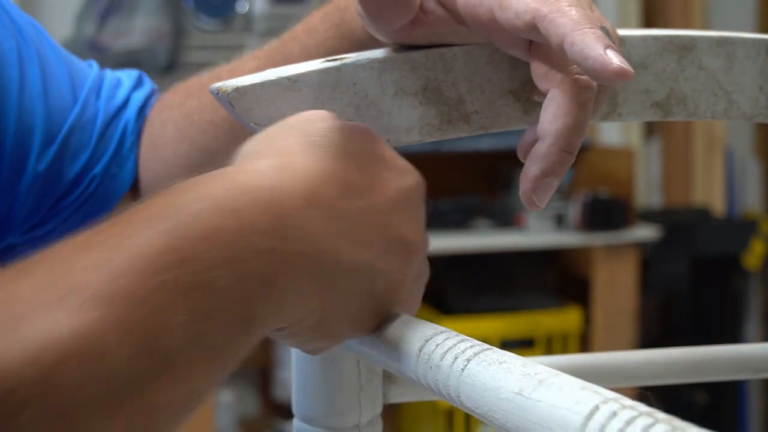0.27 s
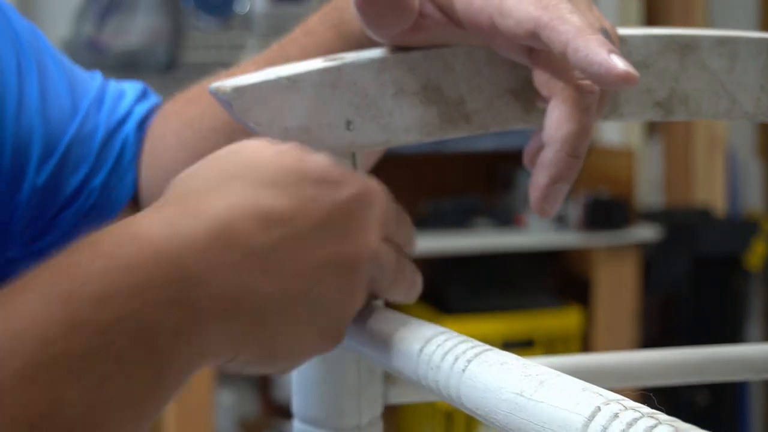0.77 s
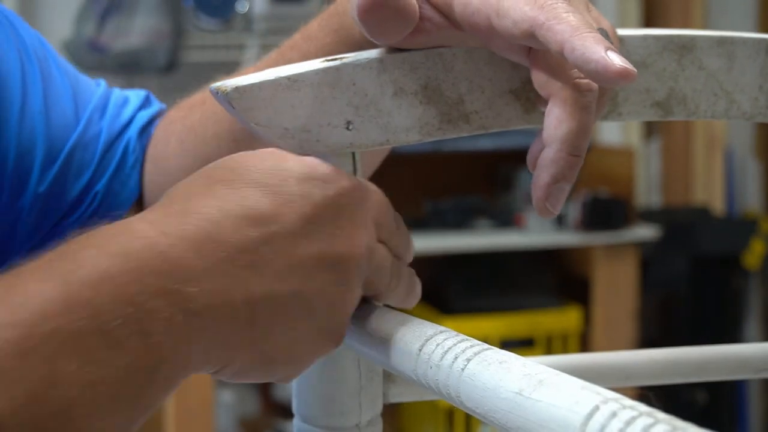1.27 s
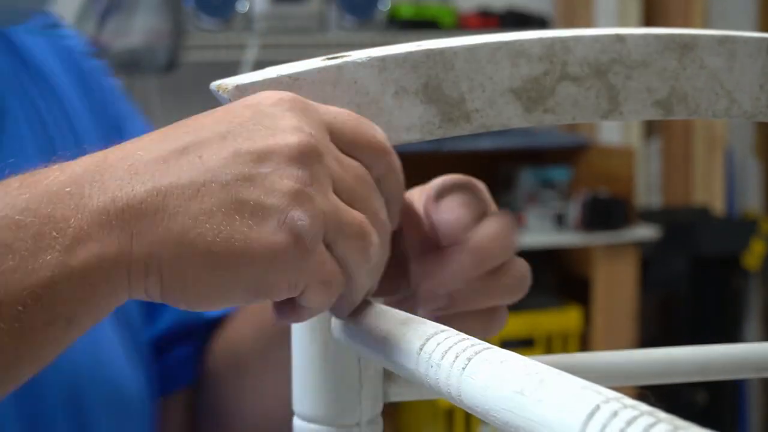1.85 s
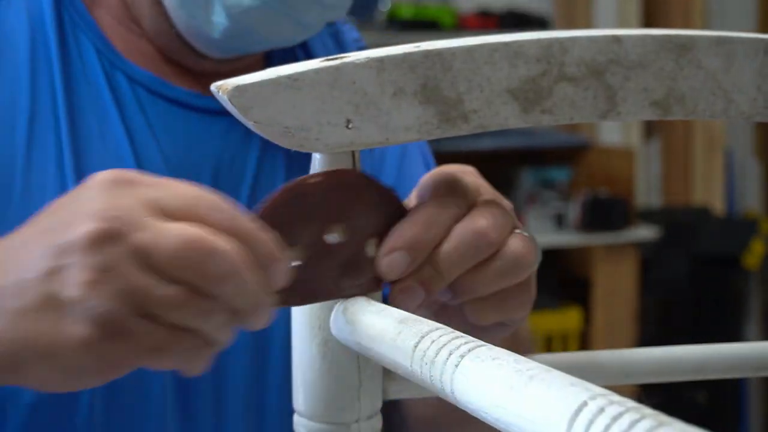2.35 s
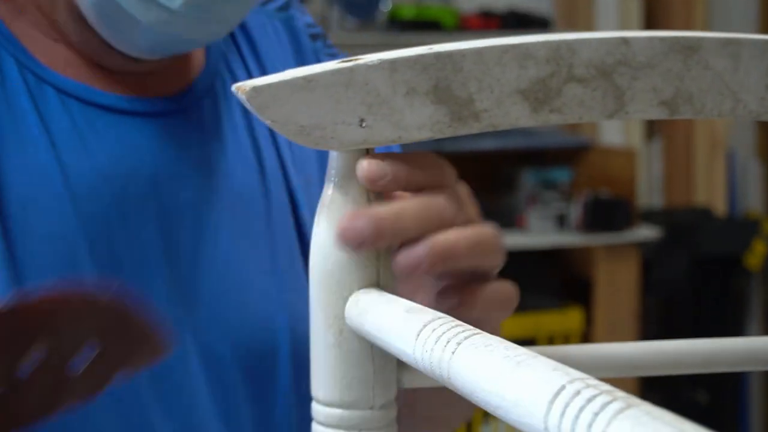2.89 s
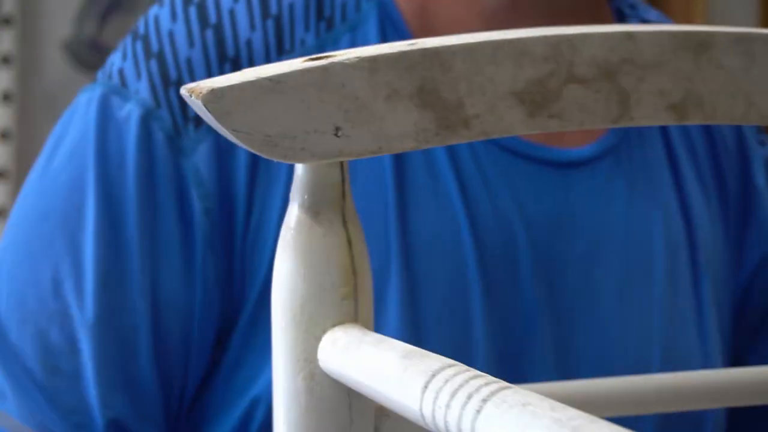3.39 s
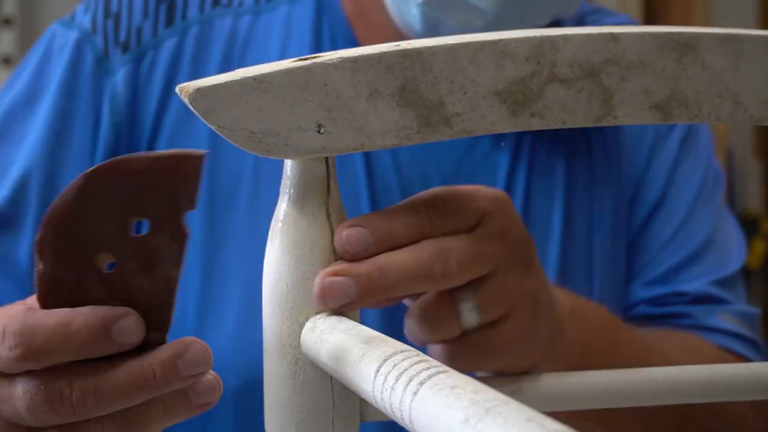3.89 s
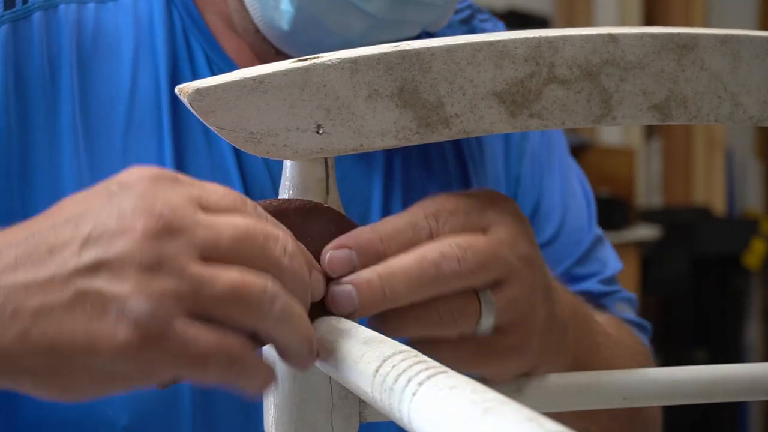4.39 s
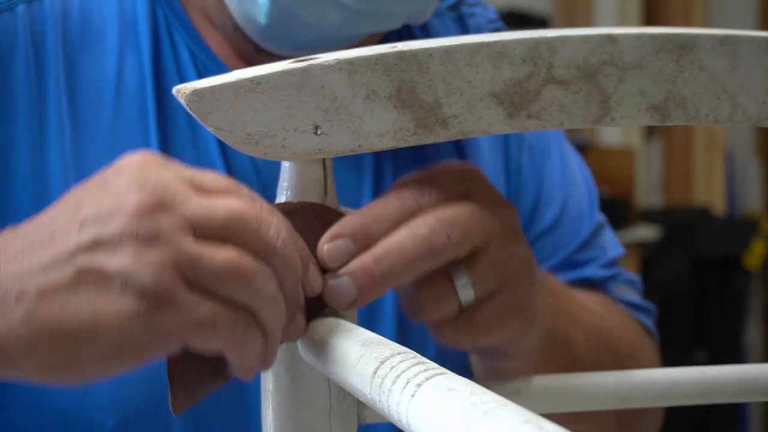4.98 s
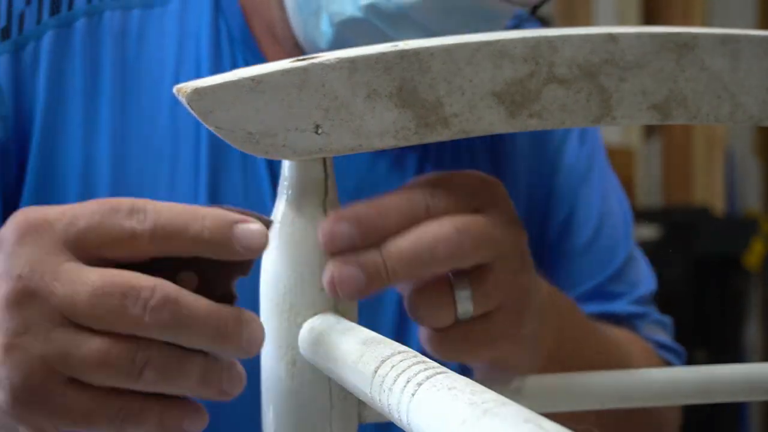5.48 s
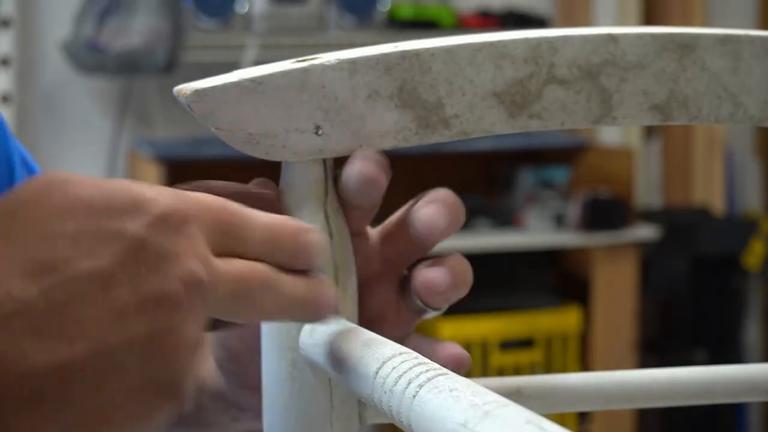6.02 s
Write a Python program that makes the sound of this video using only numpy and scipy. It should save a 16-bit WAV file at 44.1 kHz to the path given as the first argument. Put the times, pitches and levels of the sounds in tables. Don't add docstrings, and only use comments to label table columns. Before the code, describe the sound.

Close, sped-up hand sanding: bursts of raspy hissing strokes, some twenty to thirty a second, over a bassy floor rumble. The first bout gives way to light touches, the second ends in wooden chair legs knocking and rocking with boomy clipped thumps. Skin squeaks follow, then thinner, quicker strokes with hollow spindle taps, another squeak and a final short burst. The small workshop is quiet, with thin high insect song and smeared, shifting stereo.

```python
import sys
import numpy as np
from scipy import signal
from scipy.fft import rfft, irfft
from scipy.io import wavfile
from scipy.ndimage import uniform_filter1d, map_coordinates

SR = 44100
rng = np.random.default_rng(int(sys.argv[2]) if len(sys.argv) > 2 else 0)


def inscribe(sig):
    pcm = np.round(np.clip(np.atleast_2d(sig).T, -1, 1) * 32767)
    wavfile.write(sys.argv[1], SR, pcm.astype(np.int16))


def boost_factor(decibels):
    exponent = np.asarray(decibels, float) / 20
    return 10 ** exponent


N = 275625


def rms_one(x):
    return x / np.sqrt(np.mean(x ** 2) + 1e-20)


def colour(x, spectrum):
    hz = np.maximum(np.fft.rfftfreq(N, 1 / SR), 1)
    points = np.array(spectrum)
    gain_db = np.interp(np.log(hz), np.log(points[:, 0]), points[:, 1])
    return rms_one(irfft(rfft(x) * boost_factor(gain_db), N))


def at_every_sample(slow):
    return np.interp(np.arange(N) / 20, np.arange(len(slow)), slow)


def drift(rate_hz):
    r = np.exp(-2 * np.pi * rate_hz * 20 / SR)
    slow = signal.lfilter([1], [1, -2 * r, r * r], rng.standard_normal(N // 20 + 2002))
    return at_every_sample(rms_one(slow[2000:]))


def resonance(x, hz, width_hz):
    r = np.exp(-np.pi * width_hz / SR)
    poles = [1, -2 * r * np.cos(2 * np.pi * hz / SR), r * r]
    return signal.lfilter([(1 - r * r) / 2, 0, (r * r - 1) / 2], poles, x)


def ring(clicks, hz, t60):
    r = boost_factor(-60 / (t60 * SR))
    w = 2 * np.pi * hz / SR
    return signal.lfilter([0, np.sin(w)], [1, -2 * r * np.cos(w), r * r], clicks + 1e-18)


def grains(per_s, spread_db):
    sizes = boost_factor(spread_db * np.minimum(rng.exponential(1, N), 5)) * rng.choice([-1, 1], N)
    return sizes * (rng.random(N) < per_s / SR)


def swells(rest_db, centres, lengths_ms, peaks_db, order=2):
    t = np.arange(N) / SR
    power = boost_factor(2 * rest_db)
    for s, ms, db in zip(centres, lengths_ms, peaks_db):
        power = power + boost_factor(2 * db) * np.exp(-np.abs(2000 * (t - s) / ms) ** order)
    return 10 * np.log10(power)


def background():
    # f/Hz, level/dB per Hz
    room = [(100, 2), (300, -10), (700, -9.5), (1700, -57), (3300, -61), (4400, -51), (6000, -24),
            (9000, -43), (12000, -39.5), (15500, -45)]
    hz, width_hz = 7580, 1150
    insects = resonance(resonance(rng.standard_normal(N), hz, width_hz), hz, width_hz)
    hiss = boost_factor(-48) * colour(rng.standard_normal(N), room)
    return hiss + boost_factor(-59 + 1.3 * drift(7.4)) * rms_one(insects)


def rocking():
    # start t/s, held t/s, f/Hz, peak level/dB
    rocks = [
        (2.846, 0.056, 54.5, -1.5),
        (3.111, 0.035, 47, 1.5),
    ]
    t60_s = 0.15
    t, out = np.arange(N) / SR, np.zeros(N)
    for s, held, hz, db in rocks:
        height = boost_factor(db - 60 * np.maximum(t - s - held, 0) / t60_s)
        out -= height * np.sin(2 * np.pi * hz * np.maximum(t - s, 0))
    return out


def knocks():
    # t/s, peak level/dB, hardness 0-1, floor thump level/dB
    landings = [(0.305, -31, 0, -13), (2.686, -20, 0.15, -16.5), (2.837, -17, 0.98, -42),
                (3.104, -23, 0.2, -41), (3.118, -5, 0.62, -40), (3.169, -20.5, 0.4, -28),
                (3.198, -17.5, 0.2, -30), (3.904, -32, 0.35, -42), (4.194, -44, 0.1, -48),
                (5.32, -31, 0.7, -47), (5.721, -33.5, 1, -30), (1.549, -35, 1, -46), (1.648, -45, 1, -46)]
    # f/Hz, level/dB, t60/s
    modes = [(138, -18, 0.012), (265, 5.5, 0.039), (300, 0, 0.067), (402, -1.5, 0.13), (513, -5.5, 0.042),
             (702, -5.5, 0.06), (880, -31.5, 0.12), (1410, -18.5, 0.039), ]
    mode_hz = np.array(modes)[:, 0]
    blows, thumps, crack = np.zeros((len(modes), N)), np.zeros(N), np.zeros(N)
    luck = rng.standard_normal((len(landings), 3, len(modes)))
    for (s, peak_db, hard, thump_db), rows in zip(landings, luck):
        thumps[round(s * SR)] = boost_factor(thump_db)
        crack[round(s * SR)] = boost_factor(peak_db - 27 + 17 * hard)
        tilt_db = (hard - 0.3) * 12 * np.log2(mode_hz / 250)
        for bounce, row in enumerate(rows):
            blow_db = peak_db - 11.0 - 4.1 * bounce + tilt_db + np.clip(9.3 * row, -6, 6)
            blows[:, round((s + 0.007 * bounce) * SR)] += boost_factor(blow_db) * (-1) ** bounce
    out = np.zeros(N)
    for clicks, (hz, level_db, t60) in zip(blows, modes):
        out += boost_factor(level_db) * ring(clicks, hz, t60)
    fading = signal.lfilter([1], [1, -boost_factor(-60 / (0.068 * SR))], crack + 1e-18)
    crack_spectrum = [(300, 0.0), (800, -8), (2200, -14), (9000, -72)]   # f/Hz, level/dB per Hz
    out += fading * colour(rng.standard_normal(N), crack_spectrum)
    out = signal.sosfilt(signal.butter(2, 3700, fs=SR, output="sos"), out)
    return out - ring(thumps, hz=47, t60=0.52)


def taps():
    # t/s, peak level/dB
    contacts = [(0.939, -43), (0.965, -40), (1.045, -38.5), (1.071, -44), (1.136, -38.5), (1.184, -40),
                (1.255, -44), (4.626, -40), (4.681, -39), (4.728, -36), (4.806, -39), (4.926, -34),
                (4.99, -28), (5.06, -30), (5.194, -35), (5.243, -43)]
    clicks = np.zeros(N)
    for s, peak_db in contacts:
        clicks[round(s * SR)] = boost_factor(peak_db + 6.5)
    soft = signal.sosfilt(signal.butter(2, 400, fs=SR, output="sos"), clicks + 1e-18)
    return ring(soft, hz=300, t60=0.09)


def squeaks():
    # start t/s, end t/s, f/Hz, width f/Hz, level/dB
    slips_of_skin = [
        (5.32, 5.456, 1170, 200, -50.5),
        (6.06, 6.255, 1330, 200, -55),
        (3.295, 3.39, 1420, 200, -51),
        (3.403, 3.463, 2750, 200, -40),
        (3.526, 3.615, 2620, 250, -50),
        (3.827, 4.066, 2010, 250, -56),
        (5.295, 5.542, 2100, 350, -46.5),
        (5.307, 5.53, 2520, 346, -51),
        (6.062, 6.258, 2010, 300, -52.5),
    ]
    t, out = np.arange(N) / SR, np.zeros(N)
    for start, end, hz, width_hz, level_db in slips_of_skin:
        fade = np.clip(np.minimum(t - start, end - t) / 0.02, 0, 1)
        noise = resonance(resonance(rng.standard_normal(N), hz, width_hz), hz, width_hz)
        out += boost_factor(level_db + 0.8 * drift(27)) * fade * rms_one(noise)
    return out


def stroke_levels(narrow, bands_hz=(2600,)):
    # centre t/s, peak level/dB, width t/ms, brightness level/dB, paper ring f/Hz
    bout_1 = [(0.008, -29.5, 15, -6.5, 1700), (0.049, -29, 17, -6.5, 2000), (0.089, -27.5, 16, -12.5, 3620),
              (0.134, -28, 13.6, -8, 1700), (0.18, -25, 18.4, -8.5, 1700), (0.223, -28, 18, -6, 2240),
              (0.264, -28.0, 18, -11.5, 2230), (0.31, -32.5, 14.6, -3.5, 2230), (0.37, -27, 26, -6, 2310),
              (0.493, -27.5, 19.7, -8, 2270), (0.564, -25, 14.4, -9, 1890), (0.602, -30, 15, -10.5, 2230),
              (0.649, -30.5, 8.4, -11, 1870), (0.687, -28.5, 18, -10, 2300), (0.728, -31.5, 19, -4.5, 1700),
              (0.772, -28, 19.4, -12.5, 2230), (0.813, -30.0, 17.7, -7.5, 1700),
              (0.857, -27.5, 12.5, -17.5, 2240), (0.895, -38, 9.2, -21, 2150),
              (0.935, -29.5, 10.7, -10, 2170), (0.959, -31, 11, -7.5, 2070), (0.988, -36.5, 18, -7.5, 1700),
              (1.008, -28.5, 9.3, -4, 1870), (1.033, -34.5, 33, -6.5, 1700),
              (1.076, -36.5, 11, -11.5, 2250), (1.132, -36, 23, -2.5, 2250), (1.16, -31, 8.7, -6.5, 3490),
              (1.179, -37.5, 14, -1.5, 2230), (1.203, -33, 12.6, -4.5, 2230), (1.223, -40, 11, 5.5, 2440),
              (1.242, -35.5, 18, -10.5, 1700), (1.262, -35.5, 9.7, 1, 2230), (1.279, -33, 11, -13, 2040),
              (1.314, -32, 15, -8, 1700), (1.356, -28.5, 14.4, -16.5, 1870), (1.387, -32.5, 11, -4, 1700),
              (1.422, -26.5, 14, -11.5, 2040)]
    bout_2 = [(2.025, -29, 9.6, -15, 2230), (2.066, -28, 16, -10.5, 2200), (2.109, -28.5, 20, -9.5, 1560),
              (2.158, -28, 15.7, -8, 2000), (2.204, -23, 16.5, -15, 1700), (2.252, -28, 20.5, -7.5, 1540),
              (2.297, -27, 20, -5.5, 3140), (2.353, -29, 22, -5.5, 2440), (2.402, -26.5, 27, -9, 3230),
              (2.451, -27, 15.5, -8, 3220), (2.495, -24.5, 24, -10.5, 1700), (2.551, -26, 18, -7, 3490),
              (2.597, -27, 22.6, -3.5, 3190), (2.65, -30.5, 21, -5, 1700), (2.693, -29, 22, -1.5, 2230),
              (2.751, -31, 23, -4, 2070), (2.795, -26.5, 20.6, -6.5, 3240), (2.853, -29, 18.5, -11, 1860),
              (2.896, -27.5, 24.6, -6, 2040)]
    bout_3 = [(4.163, -33.5, 14.5, 0, 2810), (4.198, -35, 15.4, -2, 1300), (4.225, -33.5, 16, -4, 3430),
              (4.26, -34.5, 9.8, -9, 1300), (4.28, -44, 12, 0, 1560), (4.32, -43.5, 29, -16, 1290),
              (4.368, -34.5, 17, -12, 2000), (4.403, -33, 16.4, -7, 3190), (4.433, -33, 13.4, -4.5, 1700),
              (4.468, -34.5, 10.6, -5, 1410), (4.498, -34.5, 8.9, -2, 2060), (4.532, -36.5, 14, -2, 2100),
              (4.563, -37, 13, -5, 3120), (4.597, -32, 10.7, -6, 3070), (4.627, -32, 13, 1.5, 1560),
              (4.66, -32.5, 13, -2, 3120), (4.688, -30, 9.8, -3.5, 3490), (4.72, -31.5, 11, -1, 3220),
              (4.749, -35, 12.5, -1, 2440), (4.787, -32, 10, -5, 2690), (4.818, -28, 11, -5, 2230),
              (4.859, -30.5, 7, -3.5, 2750), (4.885, -32.5, 14, -2, 2480), (4.921, -29, 10.7, -6, 1310),
              (4.949, -32, 12.6, -1.5, 2900), (4.983, -30.5, 13, -6.5, 3200), (5.012, -36.5, 16, 2.5, 2460),
              (5.049, -27.5, 9.8, -6.5, 2440), (5.083, -30.5, 13.3, -6, 2920), (5.116, -30, 11.6, -5, 3490),
              (5.147, -32.5, 12, 1.5, 2250), (5.183, -33, 13, -5.5, 3490), (5.212, -33, 12, 4, 3490),
              (5.244, -30.5, 9.5, 0, 2820), (5.275, -28, 10.7, -1.5, 2280)]
    bout_4 = [
        (5.81, -39, 16, -11, 1570),
        (5.831, -33.5, 15, -5.5, 1990),
        (5.869, -39, 14, -7.5, 2230),
        (5.91, -29.5, 12.6, -9.5, 2250),
        (5.945, -26.5, 14.5, -8.5, 2520),
        (5.981, -26.5, 13, -7, 3520),
        (6.017, -26.5, 18, -8.5, 2880),
    ]
    touches = [(1.095, -41, 12, -5, 2300), (1.117, -34, 9.3, -5, 2220), (1.482, -47, 7.6, -35, 1700),
               (1.61, -49.5, 26, -12, 2000), (1.748, -49, 9, -9, 2500), (1.815, -48, 44, -21, 1700),
               (1.55, -37, 4.8, -19, 2290), (1.654, -43.5, 14, -10, 2300), (1.883, -39, 22, -12, 3300),
               (1.962, -40, 68, -18, 2400), (2.993, -49, 7.8, -17, 2000), (3.015, -27.5, 11.7, -6.5, 2780),
               (3.118, -33.5, 15, -22, 1500), (3.388, -35.5, 12, -21, 1600), (3.439, -35, 39, -25, 2730),
               (3.548, -40.5, 17, -18, 3060), (3.879, -46, 51, -14, 3600), (4.072, -40.5, 19, -13, 2600),
               (5.478, -51.5, 14, 7.5, 5000), (5.605, -57, 16, 1, 3500), (5.725, -48, 47, -11, 1700),
               (6.043, -34, 17, -6, 2900), (6.1, -40, 12, -14, 2200)]
    ring_db, ring_octaves = 4.5, 0.15
    linger_db, linger_t60_s = -9.5, 0.11
    s, peak_db, width_ms, bright_db, ring_hz = np.transpose(bout_1 + bout_2 + bout_3 + bout_4 + touches)
    ms = np.arange(N // 20 + 1) * 20000 / SR
    phase = (ms - 1000 * s[:, None]) / (narrow * np.maximum(width_ms, 5)[:, None])
    swell = np.exp(-np.abs(phase) ** 2.5)
    hz = np.array(bands_hz)[:, None]
    top = np.clip(np.log(hz / 2900) / np.log(6700 / 2900), 0, 1)
    paper_ring = np.exp(-(np.log2(hz / ring_hz) / ring_octaves) ** 2) - 0.3
    level_db = peak_db + top * (bright_db + 6.0) + ring_db * paper_ring
    power = boost_factor(2 * level_db) @ swell + 1e-12
    keep = boost_factor(-2400 / (linger_t60_s * SR))
    power += boost_factor(2 * (linger_db - 1.1 * top)) * signal.lfilter([1 - keep], [1, -keep], power)
    return [at_every_sample(10 * np.log10(p)) for p in power]


def hands():
    # t/s, level/dB
    weight = [(0, -23), (0.36, -21), (0.47, -30.5), (0.58, -21), (1.42, -39), (1.77, -31), (2.02, -28.5),
              (2.2, -22), (2.78, -13), (2.86, -14.5), (3.09, -23.5), (3.25, -21.5), (3.62, -27.5),
              (3.95, -29), (4.5, -23), (5.25, -21), (5.6, -33), (6.25, -43)]
    # centre t/s, length t/ms, rumble level/dB, frame thud level/dB
    jolts = [(0.08, 12, -10.5, -56), (0.334, 27, -20, -41), (0.83, 110, -17.5, -57),
             (1.072, 60, -13.5, -45), (1.2, 330, -18.5, -49), (1.55, 130, -18, -41),
             (2.091, 44, -15.5, -39), (2.261, 33, -19, -32.5), (2.714, 45, -10, -26.5),
             (2.857, 41, -14.5, -18.5), (2.91, 65, -16, -37), (3.136, 29, -27, -22),
             (3.21, 127, -12.5, -24), (3.445, 116, -13.5, -28), (3.618, 180, -38, -34),
             (3.81, 100, -24, -64), (4.26, 104, -19.5, -52), (4.7, 140, -14, -53), (4.81, 27, -35, -38),
             (4.86, 110, -15, -55), (5.0, 80, -12, -36), (5.25, 180, -12.5, -33), (5.77, 48, -33, -38),
             (6.01, 300, -23.5, -41)]
    # centre t/s, length t/ms, body level/dB, drag level/dB
    slides = [(0.0, 46, -59, -34), (0.45, 490, -39.5, -48.5), (1.42, 92, -45, -74), (1.57, 47, -42, -56),
              (2.08, 140, -39.5, -45), (2.712, 61, -44, -33), (2.852, 39, -30, -46), (3.022, 47, -37, -52),
              (3.05, 56, -31, -43), (3.129, 37, -20.5, -44.5), (3.375, 130, -39, -43),
              (3.438, 88, -31, -37.5), (3.617, 130, -38, -42), (3.65, 81, -33, -58),
              (4.199, 9.4, -23.5, -33), (4.271, 86, -55, -43.5), (3.95, 190, -63, -51.5),
              (4.67, 62, -51, -42), (5.25, 390, -44, -61), (5.42, 200, -38, -51), (5.83, 95, -38, -43),
              (6.02, 95, -68, -39), (6.2, 170, -40, -50.5)]
    weight_db = np.interp(np.arange(N) / SR, *np.transpose(weight))
    swing_db = weight_db - weight_db.mean()

    s, ms, rumble_db, thud_db = np.transpose(jolts)
    rumble_db = swells(weight_db, s, ms, rumble_db)
    thud_db = swells(-44.5 + 0.2 * swing_db, s, 0.5 * ms, thud_db)

    s, ms, body_db, drag_db = np.transpose(slides)
    sanding = uniform_filter1d(boost_factor(2 * stroke_levels(narrow=0.27)[0]), round(0.052 * SR))
    rest_db = 10 * np.log10(boost_factor(2 * -54) + boost_factor(2 * -6) * sanding)
    body_db = swells(-44 + 0.051 * swing_db, s, ms, body_db, order=3)
    return rumble_db, thud_db, body_db, swells(rest_db, s, ms, drag_db, order=6)


def frame(rumble_db, thud_db, body_db):
    # f/Hz, level/dB per Hz
    floor_spectrum = [(10, -6), (40, 0), (53, 0.5), (62, -5.5), (72, -8.5), (92, -18), (125, -35),
                      (200, -68)]
    thud_spectrum = [(60, -59), (130, -0.5), (200, -4.5), (300, -4.5), (450, -12), (2000, -110)]
    body_spectrum = [(200, -49), (460, 1), (700, -1), (1000, -1.5), (1300, -8.5), (5000, -100)]
    rumble = colour(rng.standard_normal(N), floor_spectrum)
    swing = np.sqrt(uniform_filter1d(rumble ** 2, size=2600))
    rumble = colour(rumble / (swing + 0.036), [(60, 4.5), (110, 0.5), (250, -58)])
    strokes = boost_factor(0.4 * (np.maximum(stroke_levels(narrow=0.66)[0], -50) + 34.0))
    thud = colour(grains(per_s=760, spread_db=1.5), thud_spectrum)
    thud *= boost_factor(thud_db - 5.5 + 3.8 * drift(4.6))
    body = colour(grains(per_s=1500, spread_db=1.5), body_spectrum)
    body *= boost_factor(body_db - 3.5 + 0.86 * drift(21)) * strokes
    return boost_factor(rumble_db) * rumble + thud + body


def paper(drag_db):
    # f/Hz, width f/Hz, level/dB
    spindle = [(1700, 24, 8.5), (2136, 32, 7.5), (2433, 16, 6), (3090, 31, -0.5), (3310, 49, 3.5)]
    # f/Hz, level/dB per Hz
    grit_spectrum = [(700, -12), (1300, -9.5), (1700, -5), (2800, -5), (3500, -3.5), (4300, -7.5),
                     (5200, -10.5), (6300, -8.5), (7500, -11.5), (10000, -16), (13000, -29.5), (15500, -35)]
    drag_spectrum = [(700, -36), (1300, 0), (2300, -1), (3300, -7.5), (4200, -4.5), (5200, -15),
                     (7500, -20), (11000, -43), (15500, -56)]
    grit = grains(per_s=9000, spread_db=1.5)
    rung = grit.copy()
    for hz, width_hz, db in spindle:
        rung += (boost_factor(db) - 1) * resonance(grit, hz, width_hz)
    edges = np.geomspace(600, 16500, 17)
    levels_db = stroke_levels(narrow=0.63, bands_hz=np.sqrt(edges[1:] * edges[:-1]))
    spectra = rfft([colour(rung, grit_spectrum), colour(rng.standard_normal(N), drag_spectrum)])
    hz = np.fft.rfftfreq(N, 1 / SR)
    out = np.zeros(N)
    for low, high, level_db in zip(edges, edges[1:], levels_db):
        stroke, drag = irfft(spectra * ((hz >= low) & (hz < high)), N)
        out += boost_factor(level_db + 1.6 * drift(27.4)) * stroke
        out += boost_factor(drag_db - 2.0 + 1.8 * drift(6.0)) * drag
    return out


def scene():
    rumble_db, thud_db, body_db, drag_db = hands()
    mono = background() + rocking() + knocks() + taps() + squeaks()
    mono = mono + frame(rumble_db, thud_db, body_db) + paper(drag_db)
    return np.array([mono, mono])


def speed_up_slips(x, wobble, ragged):
    # start t/s, end t/s, low f/Hz, high f/Hz, left leads by phase/rad
    slips = [(0.32, 2.38, 0, 16000, -1.0), (0, 0.5, 0, 500, 1.2), (0, 0.32, 650, 950, 2.1),
             (0, 0.32, 950, 1800, -1.0), (0, 0.32, 1800, 3400, 1.8), (0, 0.32, 3400, 16000, 0.2),
             (0.35, 1.07, 650, 11000, -1.4), (0.51, 0.55, 0, 520, 3.0), (0.5, 0.54, 8000, 16000, 3.1),
             (1.1, 1.5, 2300, 16000, 0.0), (1.25, 1.5, 1500, 2300, 1.2), (1.77, 2.33, 1300, 1850, 1.6),
             (1.84, 2.73, 1800, 16000, 2.9), (1.8, 2.42, 2500, 3950, -0.7), (2.1, 2.42, 6000, 16000, -2.3),
             (2.34, 2.73, 1300, 1800, 2.9), (2.47, 2.66, 2000, 2300, 1.9), (2.77, 2.84, 7800, 16000, 3.1),
             (2.85, 4.0, 7800, 16000, 0.0), (4.33, 5.11, 0, 16000, -3.12), (4.5, 4.6, 450, 620, -2.3),
             (4.2, 4.34, 600, 1150, -3.0), (4.3, 4.76, 1150, 2400, 0.5), (4.03, 4.76, 2400, 16000, -2.4),
             (4.0, 4.25, 7500, 16000, 2.4), (4.4, 4.46, 8500, 16000, 3.05), (4.58, 4.76, 2900, 3500, 0.0),
             (4.83, 5.11, 2600, 16000, 1.7), (4.845, 4.96, 500, 2900, 1.9), (5.0, 5.11, 400, 700, 0.7),
             (5.31, 6.25, 1100, 3300, -2.1), (5.31, 5.55, 700, 16000, -2.0), (5.55, 5.95, 950, 1200, 2.6),
             (5.76, 5.86, 0, 380, 1.9), (5.87, 5.96, 0, 380, -0.1), (5.99, 6.25, 0, 1150, 2.8),
             (6.07, 6.25, 320, 900, -1.6), (6.06, 6.25, 1150, 16000, -1.7), (6.09, 6.18, 9000, 16000, -3.0),
             (4.32, 5.11, 0, 650, -3.0), (2.47, 2.64, 5800, 7600, 1.9), (1.85, 2.1, 4400, 16000, 1.9),
                   (2.1, 2.42, 4400, 6000, 2.3), (4.33, 4.58, 2800, 6500, -2.0),
                   (4.795, 4.83, 1900, 2300, 1.9), (4.812, 4.83, 2800, 9500, -2.7),
                   (5.0, 5.09, 1950, 2300, 2.2), (4.6, 4.65, 250, 1000, -2.7), (4.8, 4.84, 350, 1000, -2.8)]
    hz, t, frames = signal.stft(x, SR, nperseg=1024, noverlap=768)
    lead = np.full(frames.shape[1:], 0.73)
    for start, end, low_hz, high_hz, radians in slips:
        lead[np.ix_((hz >= low_hz) & (hz < high_hz), (t >= start) & (t < end))] = radians

    luck = rng.standard_normal((3, *lead.shape))
    luck = uniform_filter1d(uniform_filter1d(luck, size=9, axis=1), size=11, axis=2)
    up, along, patchy = luck / luck.std()
    broad = uniform_filter1d(rng.standard_normal(lead.shape), size=90, axis=0)
    broad = rms_one(uniform_filter1d(broad, size=4, axis=1))
    brief = rms_one(uniform_filter1d(rng.standard_normal(lead.shape), size=5, axis=0))
    unsteady = 0.45 * patchy + 0.6 * broad + 1.1 * brief

    bins, steps = np.indices(lead.shape)
    places = [bins + ragged * up * np.minimum(bins, 70), steps + 20 * ragged * along]
    lead = map_coordinates(lead, places, order=0, mode="nearest")
    locked = 0.97 * np.sin(lead / 2) ** 120
    lead = lead + wobble * (1 - locked) * np.clip(hz / 4000, 0.3, 2.2)[:, None] * unsteady
    turned = frames * np.exp(0.5j * lead * np.array([1, -1])[:, None, None])
    return signal.istft(turned, SR, nperseg=1024, noverlap=768)[1][:, :N]


def band_limit(x):
    return signal.sosfilt(signal.butter(12, 15720, fs=SR, output="sos"), x)


def record(dry):
    mix = np.clip(speed_up_slips(dry, wobble=0.4, ragged=0.093), -1, 1)
    return band_limit(mix)


dry = scene()
out = record(dry)
inscribe(out)
```